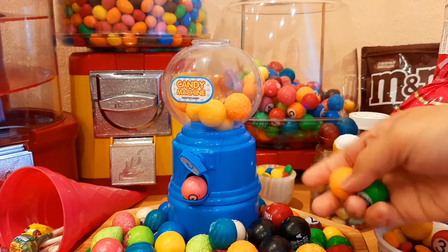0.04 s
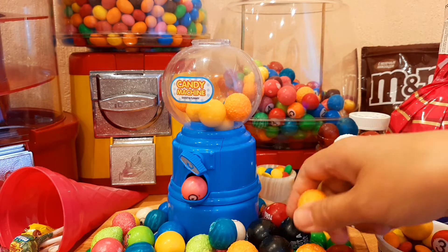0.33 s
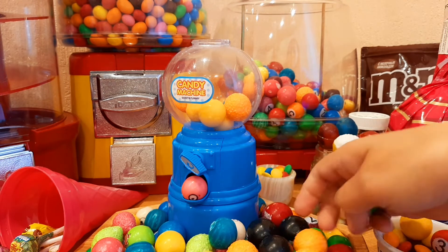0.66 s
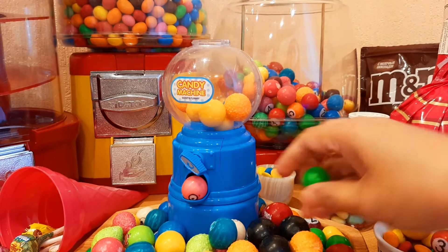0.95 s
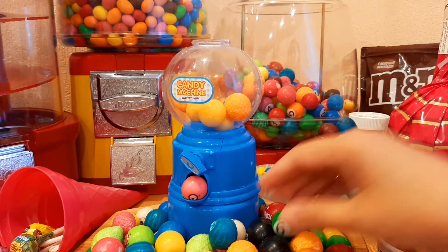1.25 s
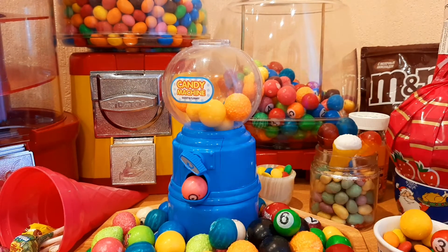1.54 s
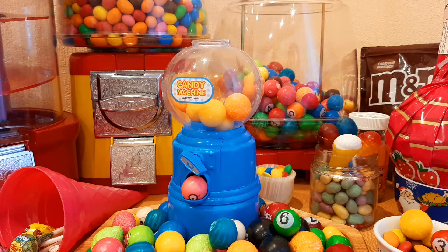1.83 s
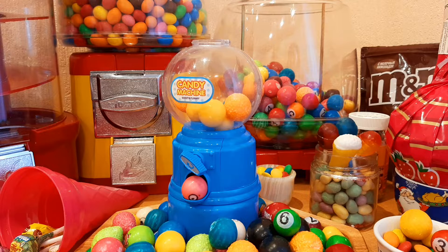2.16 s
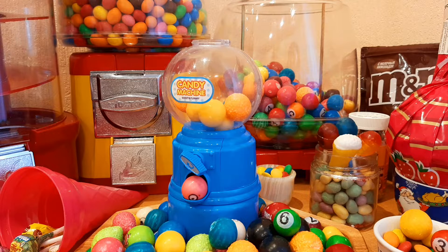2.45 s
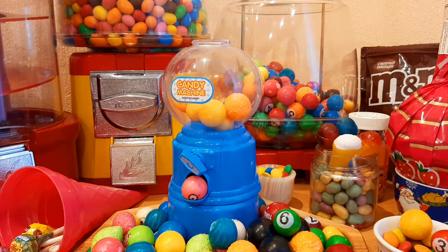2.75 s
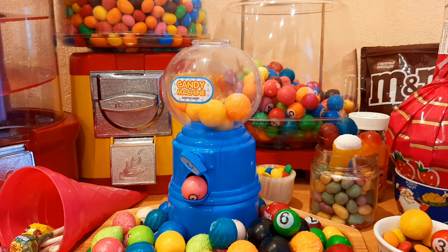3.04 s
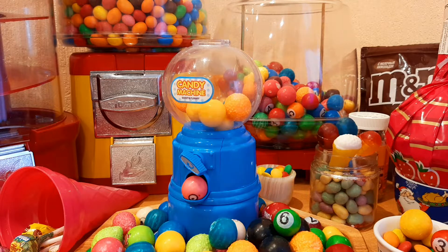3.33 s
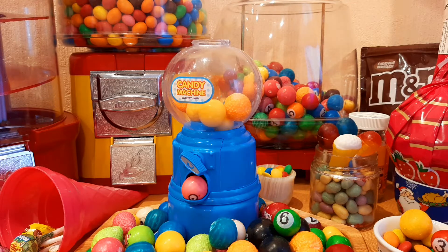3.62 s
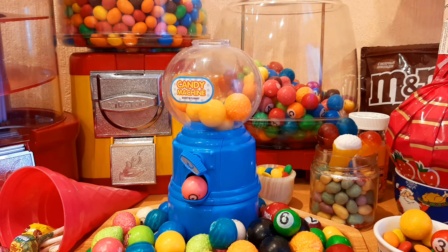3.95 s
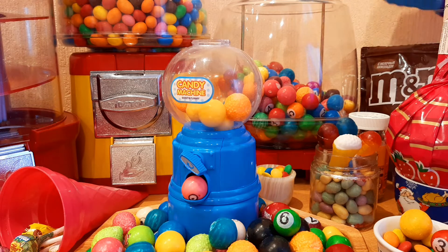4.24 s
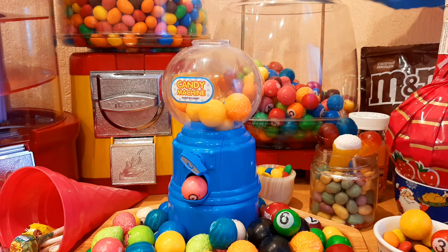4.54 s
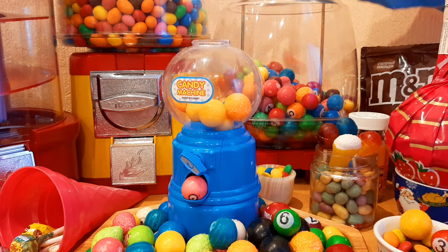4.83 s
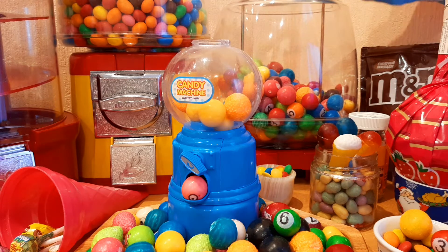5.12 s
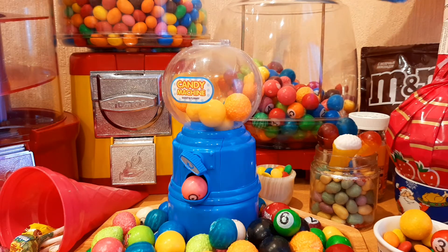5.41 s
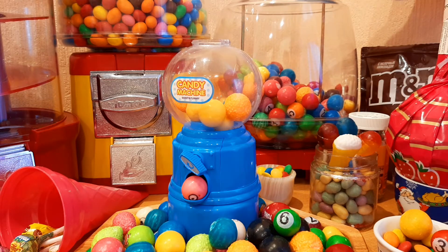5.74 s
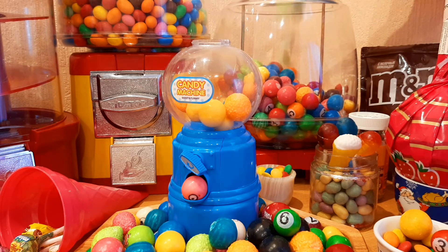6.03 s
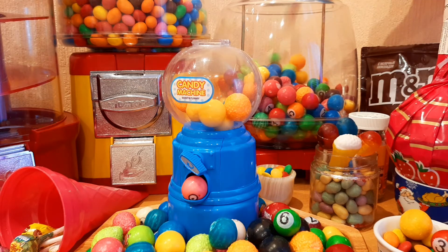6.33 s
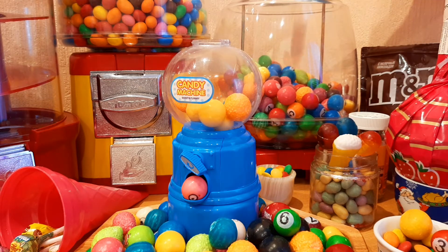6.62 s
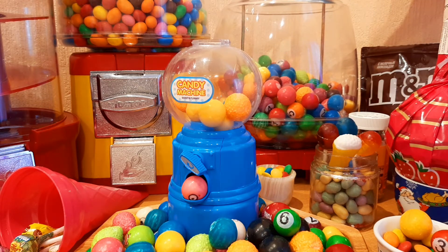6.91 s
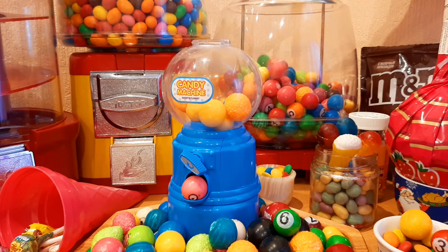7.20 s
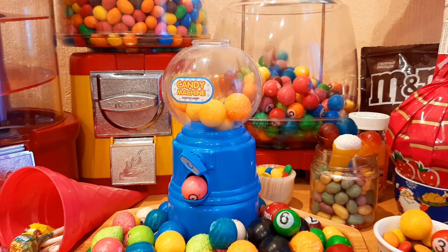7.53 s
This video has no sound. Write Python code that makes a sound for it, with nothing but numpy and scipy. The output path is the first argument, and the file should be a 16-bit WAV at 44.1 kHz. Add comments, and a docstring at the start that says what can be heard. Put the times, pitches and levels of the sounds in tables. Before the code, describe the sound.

Gumballs clack down on a table, a stiff plastic bag crinkles, then gumballs are shaken out and clatter into a plastic bowl.

```python
"""A small live room with a table. A hand sets down a few gumballs, whose hard shells clack together.
A stiff plastic bag is grabbed close by on the right and lifted: creases snap, dimples pop, walls flex.
Gumballs are shaken out of it and clatter onto the heap in the big plastic bowl of a dispenser,
thumping its base and ringing its wall. The room answers every hit."""
import sys
import numpy as np
from scipy import signal
from scipy.fft import rfft, irfft
from scipy.io import wavfile
from scipy.ndimage import uniform_filter1d, minimum_filter1d

SR = 44100
rng = np.random.default_rng(int(sys.argv[2]) if len(sys.argv) > 2 else 0)


def inscribe(sig):
    """Save sig as 16-bit PCM at rate SR to the path in sys.argv[1].

    A 1-D sig is mono; a 2-D sig holds one channel per row.
    Samples are clipped to [-1, 1] before scaling.
    """
    pcm = np.round(np.clip(np.atleast_2d(sig).T, -1, 1) * 32767)
    wavfile.write(sys.argv[1], SR, pcm.astype(np.int16))


N = 333837
TIME = np.arange(N) / SR
HIT_SIZE = 4096  # samples in one hit
AGE = np.arange(HIT_SIZE) / SR  # seconds since the hit
HZ = np.fft.rfftfreq(HIT_SIZE, 1 / SR)

# Gumballs landing in the bowl: start_s, clatter_db, hardness_db, thump_db, wall_db, wall_pitch_hz
LANDINGS = [(4.874, 14, -7.5, 8.5, 2, 1244), (4.9599, 13.5, -6, -13, 14, 869),
            (4.9684, 11, -5, -21, 11.5, 882), (5.0436, 11.5, -5.5, -4, 3.5, 1134),
            (5.0737, 5.5, 4.5, -8, 2, 1920.0), (5.214, 17, -8, -8, 10, 906), (5.3116, 7, -2.5, 3, 3, 920.0),
            (5.3448, 15.5, -7.5, 1.5, 8.5, 906), (5.3729, 10.5, -4, -18.0, 8, 950),
            (5.477, 10, 2, 6, -1, 1130), (5.5683, 0.5, -11, -2, 0.5, 936), (5.7418, -2, -3, -8.0, -2, 908),
            (6.032, 7.5, -2, 0.5, -3.5, 898), (6.098, 8, -4, -19, 2, 944), (6.1435, 9, -4.5, 2.5, 3, 905),
            (6.163, 10, -5, 3, 5, 958), (6.176, 9, -8, 4, 0, 920), (6.2522, 11.5, -10, 3, 6, 560),
            (6.297, -1, 9.5, -31, -3, 1960), (6.3652, 12.5, -1, 1, 3.5, 1980),
            (6.4327, 12, 0.5, 3.5, 6, 959), (6.5466, 10.5, 1.5, -2.5, -2, 2150),
            (6.574, 12, -12, 5.5, 7.5, 539), (6.6969, 7, 1, -6, -2, 874), (6.7552, 12, -3.5, 6.5, -4, 2010),
            (6.8198, 12, -4, -2, -9, 1510), (7.1574, 11, -1.5, 3, 1.5, 943), (7.175, 7, 2.5, -1, -0.5, 985),
            (7.212, 8, 8.5, -27, 3.5, 1990), (7.2934, 15, -6.5, 9, 5.5, 960),
            (7.3287, 7.5, 6, 6.5, -2, 1103), (7.384, 11, -3, 3.5, -4, 2040), (7.462, 14.5, 1, 4, 6, 1130)]
# Tone of the clatter: freq_hz, gain_db
CLATTER_EQ = [(40, -26.5), (100, -11), (200, -23.5), (300, -9.5), (550, -4), (900, -1), (1350, -7),
              (1900, -5), (3200, -9), (5000, -9.5), (7000, -11.5), (9000, -21), (15000, -28)]
# Resonances of the bowl: freq_hz, width_hz, boost_db
BOWL_RESONANCES = [(262, 52, 12.5), (365.5, 13, 7), (1920, 610, 2.5)]
def landings(thump_hz=335, rise_s=0.0008):
    """A gumball lands: the blow rattles its neighbours, thumps the base and rings the wall."""
    out = np.zeros((2, N))
    for start_s, clatter_db, hardness_db, thump_db, wall_db, wall_hz in LANDINGS:
        force = contact(ring_s=0.0053, ring_db=7.5)
        force = chained(force, gain_db=0, spread_s=.015, fade_s=0.014, ring_s=0.0029, count=5)
        # small, later rebounds
        force = chained(force, gain_db=-14.5, spread_s=.055, fade_s=0.049, ring_s=0.0059, count=3)
        force = force * (1 - np.exp(-AGE / rise_s))
        bowl_db = peaks(BOWL_RESONANCES, shift=rng.uniform(0.96, 1.04))
        eq = curve(CLATTER_EQ, HZ) + bowl_db + ripple(depth_db=2.2)
        clatter = amp(clatter_db) * struck(force, eq, shelves(0, hardness_db, 490, 4660))
        thump = amp(thump_db) * note(thump_hz * rng.uniform(0.928, 1.109), ring_s=0.0049)
        wall = amp(wall_db) * wall_chatter(wall_hz, ring_s=0.0056)
        add(out, start_s, panned(clatter + thump + wall, rng.normal(1.0, 0.86), samples_per_db=1))
    return out


def wall_chatter(hz, ring_s, spread_s=.011, detune=0.19, skip_db=-6, skips=2):
    """A ball strikes the wall, then skips onto nearby spots that ring a little higher or lower."""
    out = note(hz, ring_s)
    for when, spot in rng.random((skips, 2)):
        skip = note(hz * (1 + detune * (2 * spot - 1)), ring_s)
        add(out, when * spread_s, amp(skip_db) * skip)
    return out / np.linalg.norm(out[0])


# Light knocks on plastic: start_s, level_db, pitch_hz
KNOCKS = [(1.7644, -19, 1060), (3.112, -20, 890), (3.138, -18, 820), (3.217, -22, 950), (3.303, -13, 1184),
          (3.313, -17, 1350), (3.426, -22, 1100), (3.929, -30.5, 1785), (4.886, 8, 1070), (4.935, 1, 890),
          (5.093, -5, 1720), (5.107, 4.5, 933), (5.143, 3.5, 880), (5.1792, 8.5, 897), (5.249, 1, 950),
          (5.526, -1, 804), (6.119, 4, 1700), (6.492, 2, 1000), (6.5212, 10, 870), (6.6075, 5, 800),
          (6.635, -0.5, 800), (6.917, -3, 893), (7.2547, 3, 1520), (7.5517, 9, 895)]
def knocks(gain_db=-5, tap_db=4.5, above_db_per_octave=3.5, below_db_per_octave=6):
    """Gumballs shift and rebound against plastic: one short hollow note inside a dull tap."""
    out = np.zeros((2, N))
    for start_s, level_db, pitch_hz in KNOCKS:
        octaves = np.log2((HZ + 1) / pitch_hz)
        skirt_db = np.maximum(above_db_per_octave * octaves, -below_db_per_octave * octaves)
        tap = struck(contact(ring_s=0.011, ring_db=20), curve(CLATTER_EQ, HZ) - skirt_db)
        tone = note(pitch_hz, ring_s=0.004, rise_s=0.00063)
        add(out, start_s, amp(level_db + gain_db) * (tone + amp(tap_db) * tap))
    return out


# Tone of shells shifting in the heap: freq_hz, gain_db
HEAP_EQ = [(50, -15), (150, -6.5), (950, 0), (2000, 2), (5000, -5.5), (9000, -18), (15000, -30)]
def heap(ticks_db=-4.5, wash_db=-11, ticks_per_s=110, spread_db=3, variants=32):
    """The heap settles in separate light touches over a faint wash of sliding shells."""
    touches = [shell_touch() for _ in range(variants)]
    chance, pick, size = rng.random((3, N))
    ticks = np.zeros((2, N))
    for i in np.flatnonzero(chance < ticks_per_s / SR):
        strength = amp(-spread_db * np.log(size[i] + 0.024))
        add(ticks, i / SR, strength * touches[int(pick[i] * variants)])
    wash = filtered(grains(per_s=460, spread_db=4.0), curve(HEAP_EQ, HZ) + peaks(BOWL_RESONANCES))
    return (amp(ticks_db) * unit_rms(ticks) + amp(wash_db) * unit_rms(wash)) * heap_motion()


def shell_touch():
    """Two gumballs in the heap meet lightly, with a pitch of their own."""
    pitch_hz = 800 * 2 ** (2.94 * rng.random() ** 2)
    pitch_boost = peaks([(pitch_hz, .2 * pitch_hz, 13)])
    eq = curve(HEAP_EQ, HZ) + peaks(BOWL_RESONANCES) + pitch_boost + ripple(depth_db=3)
    return struck(contact(ring_s=0.0044, ring_db=20.5), eq)


# Shakes that send gumballs streaming over the heap: start_s, length_s, level_db, swell_db
SHAKES = [(4.45, 0.33, -33, -16), (4.88, 0.73, -48, 10), (6.05, 0.17, -24, 3), (6.88, 0.98, -60, -18)]
def heap_motion(stir_db=-44, settle_s=0.15):
    """Envelope of the heap: it streams during a shake, and every landing stirs it briefly."""
    kicks = np.zeros(N)
    for start_s, clatter_db, *_ in LANDINGS:
        kicks[np.searchsorted(TIME, start_s)] = amp(clatter_db + stir_db) ** 2
    stir_power = signal.lfilter([1], [1, -np.exp(-2 / (settle_s * SR))], kicks)
    stream = gestures(SHAKES, attack_s=0.063, release_db_per_s=107)
    return np.sqrt(stir_power + stream ** 2)


# Gumball against gumball on the table: start_s, level_db, brightness_db
CLACKS = [(0.01, -9.5, 7), (0.0161, -4, 10.5), (0.486, 2.5, -10), (0.49, 7.5, 4.5), (0.62, -10.5, -9),
          (0.6505, 4, 0), (0.658, -3, -13), (0.7081, -10, -23), (0.7782, -13, -22), (0.815, -19.5, -39),
          (1.167, -47.5, 27.5), (1.2268, 8.5, 17.5), (1.2589, 1, 8), (1.3159, -4.5, 13), (1.385, -8.5, -11),
          (1.6476, -19.5, 12), (1.6682, -11, -15), (1.741, -18.5, 13), (1.764, -17, -4)]
# Tone of a clack: freq_hz, gain_db
CLACK_EQ = [(40, -32), (120, -21), (300, -9), (900, -7.5), (1600, -2.5), (2300, 3), (3500, 3.5),
            (4400, -0.5), (6000, -12.5), (8000, -27), (10500, -41), (16000, -49.5)]
# Ring of the wood under a clack: pitch_hz, level_db, t60_s
WOOD_MODES = [(125, -9.5, 0.14), (274.8, 0, .12), (351, -1, 0.12)]
def clacks(wood_db=-18):
    """Hard sugar shells meet in a very short click, and the wood rings under it."""
    out = np.zeros((2, N))
    wood = amp(wood_db) * table_boom(WOOD_MODES, rise_s=0.021)
    for start_s, level_db, brightness_db in CLACKS:
        force = contact(ring_s=.0015, ring_db=-1)
        click = struck(force, curve(CLACK_EQ, HZ), shelves(0, brightness_db, 1000, 5100))
        add(out, start_s, amp(level_db) * panned(click + wood, pan_db=6, samples_per_db=1))
    return out


# Loud buckles of the bag: start_s, level_db, brightness_db
CRINKLES = [(1.931, 0.5, -10), (1.9427, 0.5, 3.5), (1.9647, -2.5, -3), (2.0184, 1.5, -5),
            (2.0735, 2.5, 0.5), (2.165, -0.5, -5), (2.196, -8, 12), (2.3068, 3.5, -9), (2.3305, 5.5, -5),
            (2.342, 4, -0.5), (2.479, -2, 8.5), (2.5227, -2, 1), (2.569, -2.5, 2), (2.5892, 7, -9),
            (2.619, 7, -12), (2.634, -4, 11), (2.755, -4, -0.5), (2.825, 8, -7.5), (2.8894, 4.5, -18),
            (2.9289, 0, -11), (3.3429, -19.5, 22), (3.4038, -9, 6.5), (3.4672, -4, 5), (3.5032, -4, -4.5),
            (3.8606, -25, -13), (3.9977, -11.5, -11.5), (4.085, -9, 9), (4.0956, 2.5, 3),
            (4.3906, -13, 6.5), (4.5074, -10.5, 5), (4.517, -5, 7.5), (4.5479, 0.5, 3.5), (4.8593, -3.5, 2),
            (4.932, 3, -9), (5.3202, 1.5, 0), (5.3866, -8.5, 13), (5.789, -4, 2.5), (5.9141, -1, 6),
            (7.015, -4, 4)]
# Tone of snapping plastic: freq_hz, gain_db
CRINKLE_EQ = [(60, -24.5), (200, -1), (450, -1.5), (900, 0), (2000, -1), (3500, -2), (5500, -1.5),
              (8000, -8.5), (12000, -9.5), (16000, -11)]
# The bag's move from the right to near centre: time_s, left_minus_right_db
BAG_PAN = [(2.85, -4.5), (3.1, 1)]
def crinkles(gain_db=1, bass_db=-1, ring_s=0.0022, crispness=.12):
    """Creases of the stiff bag snap through and shake its hollow body; bright snaps are over sooner."""
    out = np.zeros((2, N))
    for start_s, level_db, brightness_db in CRINKLES:
        force = contact(ring_s=ring_s * amp(-crispness * brightness_db), ring_db=7.0)
        force = chained(force, gain_db=-9.5, spread_s=0.0094, fade_s=0.011, ring_s=0.0033, count=3)
        eq = curve(CRINKLE_EQ, HZ) + ripple(depth_db=2.5)
        snap = struck(force, eq, shelves(bass_db, brightness_db, 950, 5600))
        add(out, start_s, amp(level_db + gain_db) * panned(snap, automation(BAG_PAN, start_s)))
    return out


# Dimples in the bag, small ones high, wide ones low: start_s, level_db, pitch_hz
DIMPLE_POPS = [(2.012, -6.5, 3200), (2.091, 6.5, 5760), (2.118, 3, 10000), (2.232, -5, 2570),
               (2.26, -8, 13000), (2.267, -7, 11000), (2.319, 5.5, 12420), (2.382, -2, 1650),
               (2.4593, 5.5, 5700), (2.544, -0.5, 1700), (2.6487, -3, 9300), (2.725, -10.5, 3500),
               (2.9146, -3.5, 2770), (2.9491, -13, 2280), (4.316, -13.5, 1430), (4.375, -12, 1600),
               (4.47, -1.5, 1700), (4.5801, -1, 1840), (4.6292, -4.5, 1500), (4.655, -4.5, 1840),
               (4.6797, 1, 1660), (5.801, -6.5, 7000)]
def dimple_pops(relative_width=0.18, boost_db=5, skirt_db_per_octave=4.5):
    """A dimple in thin plastic flips over: a tick gathered around one short note."""
    out = np.zeros((2, N))
    for start_s, level_db, pitch_hz in DIMPLE_POPS:
        skirt_db = skirt_db_per_octave * np.abs(np.log2((HZ + 1) / pitch_hz))
        eq = curve(CRINKLE_EQ, HZ) + peaks([(pitch_hz, relative_width * pitch_hz, boost_db)]) - skirt_db
        pop = struck(contact(ring_s=0.0019, ring_db=9.5), eq)
        add(out, start_s, amp(level_db) * panned(pop, automation(BAG_PAN, start_s)))
    return out


# The bag's walls popping in and out: start_s, level_db
BAG_FLEXES = [(1.934, -2), (1.964, -4.5), (2.34, 5.5), (2.423, 1.5), (4.052, -4.5), (4.117, -2),
              (4.518, 5.5), (4.777, -5.5), (5.947, -2)]
# Hollow tone of a bag wall, before the pitch ratio shifts it: freq_hz, gain_db
BAG_WALL_EQ = [(50, -35.5), (170, -16), (270, 0), (340, -10), (480, -22), (1500, -28), (5000, -53)]
# The wall rings higher gripped taut, lower once slack: time_s, pitch_ratio
TAUTNESS = [(2.6, 1.724), (4.0, 1.074)]
def bag_flexes(rise_s=0.0069):
    """A soft push swings a wall of the bag for a few cycles."""
    out = np.zeros((2, N))
    for start_s, level_db in BAG_FLEXES:
        push = contact(ring_s=0.0033, ring_db=6) * (1 - np.exp(-AGE / rise_s))
        wall = struck(push, curve(BAG_WALL_EQ, HZ / automation(TAUTNESS, start_s)))
        add(out, start_s, amp(level_db) * panned(wall, automation(BAG_PAN, start_s)))
    return out


# Grips on the bag, swelling as the fingers tighten: start_s, length_s, level_db, swell_db
GRIPS = [(1.921, 0.73, -40, 6.5), (2.56, 0.05, -32.5, 0.5), (3.3, 0.23, -52.5, 8.5), (3.86, 0.17, -51, -13),
         (4.015, 0.14, -40.5, 1), (4.15, 0.38, -74.5, 37.5), (4.48, 0.35, -55, 17), (5.97, 0.53, -37, 9),
         (6.9, 0.62, -37, -2)]
# Hollow rustle of the sagging walls: time_s, level_db
SAG_FADER = [(4.1, -53), (4.6, -39), (5.8, -44.5), (6.35, -40), (7.57, -39.5)]
def bag_rustle(crackle_db=-2, sag_db=-1, fizz_db=-11, drum_db=-7):
    """Small creases crackle under the fingers; close by, the bag fizzes and drums; slack, it rustles."""
    eq = curve(CRINKLE_EQ, HZ) + shelves(bass_db=1.5, treble_db=-10.5, low_hz=685, high_hz=7000)
    crackle = unit_rms(filtered(grains(per_s=1700, spread_db=2.5), eq))
    fizz = unit_rms(np.diff(grains(per_s=680, spread_db=7.0), prepend=0))
    flexing = grains(per_s=600, spread_db=3.5)
    taut, slack = (unit_rms(filtered(flexing, curve(BAG_WALL_EQ, HZ / ratio))) for _, ratio in TAUTNESS)
    pan_db = automation(BAG_PAN, TIME)
    closeness = np.interp(TIME, [time_s for time_s, _ in BAG_PAN], [1, 0])
    creases = amp(crackle_db) * crackle + closeness * (amp(fizz_db) * fizz + amp(drum_db) * taut)
    grip = gestures(GRIPS, attack_s=0.00053, release_db_per_s=331)
    return creases * grip * amp([pan_db / 2, -pan_db / 2]) + amp(sag_db) * slack * fader(SAG_FADER)


# Soft bumps against the table: start_s, level_db
BUMPS = [(1.578, -27), (2.599, -19), (2.812, -2), (2.884, -11)]
# Low ring of the table top: pitch_hz, level_db, t60_s
TABLE_MODES = [(62, -6.5, 0.13), (107, 8.5, 0.054), (259, -2, 0.11)]
def table_bumps():
    """The table top booms softly when it is bumped."""
    out = np.zeros((2, N))
    boom = table_boom(TABLE_MODES, rise_s=0.017)
    for start_s, level_db in BUMPS:
        add(out, start_s, amp(level_db) * panned([boom, boom], pan_db=5.0))
    return out


def table_boom(modes, rise_s):
    """The modes of the table top swell and die away after a blow, energy 1."""
    boom = sum(amp(db - 60 * AGE / t60) * np.sin(2 * np.pi * hz * AGE) for hz, db, t60 in modes)
    fade_out = np.cos(np.pi / 2 * AGE / AGE[-1])
    boom = boom * (1 - np.exp(-AGE / rise_s)) * fade_out
    return boom / np.linalg.norm(boom)


def room(dry, wet_db, treble_db, spots):
    """Hits come from ever different spots, so their patterns of echoes take turns."""
    spot = np.arange(N) // 2048 % spots
    wet = 0
    for k in range(spots):
        send = np.sqrt(np.abs(uniform_filter1d(1. * (spot == k), size=400)))
        wet = wet + signal.oaconvolve(dry * send, reflections(), axes=1)[:, :N]
    return dry + amp(wet_db) * filtered(wet, shelves(0, treble_db, 500, 4200))


# Reverb decay: freq_hz, t60_s
ROOM_DECAY = [(150, 0.5), (400, 0.3343), (1040, 0.2666), (2760, 0.1951), (7280, 0.31), (15000, 0.31)]
# How alike left and right are in the room: freq_hz, correlation
ROOM_CORRELATION = [(100, 0.76), (450, 1), (1000, 0.4), (2000, 0.074)]
# Reverb tone: freq_hz, gain_db
ROOM_EQ = [(25, -4.5), (90, 7.5), (170, -2), (320, -2.5), (700, 0.5), (2500, 2), (7000, -3), (15000, -8.5)]
def reflections(predelay_s=0.0046, build_s=0.068):
    """Echoes of the room: sparse at first, soon dense, each band dying at its own speed."""
    t = np.arange(SR // 2) / SR
    density = np.minimum(t / build_s, 1) ** 2 + .06
    taps = rng.standard_normal((2, len(t))) * (rng.random((2, len(t))) < density) / np.sqrt(density)
    hz, age, bands = signal.stft(correlated(taps * (t > predelay_s), ROOM_CORRELATION), SR, nperseg=256)
    decay = amp(-60 * age / curve(ROOM_DECAY, hz)[:, None])
    _, tail = signal.istft(bands * decay, SR, nperseg=256)
    return filtered(tail / np.sqrt(np.sum(tail ** 2) / 2), curve(ROOM_EQ, HZ))


# Tone of the room's air: freq_hz, gain_db
AIR_EQ = [(35, -27.5), (65, -5), (120, 0), (280, -7.5), (600, -18), (2000, -15), (8000, -25)]
def room_tone(level_db=-77):
    """The faint steady air of the room."""
    noise = correlated(rng.standard_normal((2, N)), ROOM_CORRELATION)
    return amp(level_db) * unit_rms(filtered(noise, curve(AIR_EQ, HZ)))


# How alike left and right are for a close hit: freq_hz, correlation
CLOSE_CORRELATION = [(100, 1), (500, 0.7), (1200, 0.5), (3000, 0.05), (12000, 0)]
def contact(ring_s, ring_db):
    """One hard contact: a spike, then a short dense ring, a little different on each side."""
    ring = correlated(rng.standard_normal((2, HIT_SIZE)), CLOSE_CORRELATION) * np.exp(-AGE / ring_s)
    return (AGE == 0) + amp(ring_db) * unit_rms(ring) / np.sqrt(HIT_SIZE)


def chained(force, gain_db, spread_s, fade_s, ring_s, count):
    """One contact sets off a few more, the later the weaker."""
    for delay_s in spread_s * rng.random(count):
        knock = np.pad(contact(ring_s, ring_db=5.0), ((0, 0), (int(delay_s * SR), 0)))[:, :HIT_SIZE]
        force = force + rng.choice([-1, 1]) * amp(gain_db) * np.exp(-delay_s / fade_s) * knock
    return force


def grains(per_s, spread_db, clump_db=4):
    """A random train of tiny contacts of very unequal size, bunched into little slides."""
    size = amp(spread_db * np.minimum(rng.exponential(1, (2, N)), 4)) * rng.choice([-1, 1], (2, N))
    slides = unit_rms(uniform_filter1d(uniform_filter1d(rng.standard_normal(N), size=700), size=400))
    triggers = rng.random((2, N)) < per_s / SR
    return correlated(size * amp(clump_db * np.clip(slides, -2, 2)) * triggers, CLOSE_CORRELATION)


def note(hz, ring_s, rise_s=0.002):
    """One quickly damped mode after a blow, energy 1."""
    swing = np.sin(2 * np.pi * hz * AGE) * (1 - np.exp(-AGE / rise_s)) ** 2 * np.exp(-AGE / ring_s)
    return np.array([swing, swing]) / np.linalg.norm(swing)


def struck(force, eq_db, shelf_db=0):
    """Gives a force its tone at energy 1, then shelves its bass and treble."""
    return filtered(force, eq_db + shelf_db) / np.sqrt(np.sum(filtered(force, eq_db) ** 2) / 2)


def filtered(x, eq_db):
    """Minimum-phase EQ, given over HZ: it rings only after a hit."""
    log_gain = np.log(amp(np.r_[eq_db, eq_db[-2:0:-1]]))
    response = np.fft.ifft(np.exp(np.conj(signal.hilbert(log_gain)))).real
    return signal.oaconvolve(x, response[None, :HIT_SIZE // 2], axes=1)[:, :x.shape[1]]


def peaks(resonances, shift=1):
    """Bell boosts in dB over HZ."""
    return sum(db / (1 + (2 * (HZ - hz * shift) / width) ** 2) for hz, width, db in resonances)


def shelves(bass_db, treble_db, low_hz, high_hz):
    """Low and high shelf in dB over HZ: a heavy blow has more bass, a hard one more treble."""
    return bass_db / (1 + (HZ / low_hz) ** 4) + treble_db / (1 + (high_hz / (HZ + 1)) ** 4)


def ripple(depth_db, count=28):
    """A random EQ: every spot that is struck favours other frequencies."""
    knots_hz = np.geomspace(150, SR / 2, count)
    return depth_db * curve(np.c_[knots_hz, rng.standard_normal(count)], HZ)


def curve(points, hz):
    """Reads (freq_hz, value) points on a log-frequency axis."""
    freq_hz, value = np.transpose(points)
    return np.interp(np.log(hz + 1), np.log(freq_hz + 1), value)


def automation(points, time_s):
    """Reads (time_s, value) points, holding the end values."""
    return np.interp(time_s, *np.transpose(points))


def fader(points):
    """Smoothed gain from (time_s, level_db) points, silent outside them."""
    active = (TIME > points[0][0]) & (TIME < points[-1][0])
    return uniform_filter1d(amp(automation(points, TIME)) * active, size=200)


def gestures(rows, attack_s, release_db_per_s):
    """Envelope of hand movements: each starts quickly, swells or fades while it lasts, then dies away."""
    out = np.zeros(N)
    for start_s, length_s, level_db, swell_db in rows:
        t = np.maximum(TIME - start_s, 0)
        shape_db = swell_db * np.minimum(t / length_s, 1) - release_db_per_s * np.maximum(t - length_s, 0)
        out += np.minimum(t / attack_s, 1) * amp(level_db + shape_db)
    return out


def correlated(x, correlation):
    """Blends two unrelated channels until they are as alike as asked at each frequency."""
    size = x.shape[1]
    angle = np.arccos(np.clip(curve(correlation, np.fft.rfftfreq(size, 1 / SR)), -1, 1)) / 2
    mid, side = rfft(x) * [np.cos(angle), np.sin(angle)]
    return irfft(np.array([mid + side, mid - side]), size)


def panned(x, pan_db, samples_per_db=4.0):
    """The nearer side is louder and hears the sound a few samples sooner; positive is left."""
    lag = int(round(abs(pan_db) * samples_per_db))
    delays = (0, lag) if pan_db > 0 else (lag, 0)
    gains = unit_rms(amp([pan_db / 2, -pan_db / 2]))
    return np.array([g * np.pad(c, (d, 0))[:len(c)] for c, g, d in zip(x, gains, delays)])


def add(mix, start_s, sound):
    """Mixes a stereo sound in at start_s."""
    part = mix[:, max(round(start_s * SR), 0):][:, :sound.shape[1]]
    part += sound[:, :part.shape[1]]


def amp(db):
    """Decibels to gain."""
    return 10 ** (np.asarray(db) / 20)


def unit_rms(x):
    """Scales to rms 1."""
    return x / np.sqrt(np.mean(x ** 2) + 1e-20)


def scene():
    """Table, bag and bowl, each at its own distance in the room."""
    table = room(clacks() + table_bumps(), wet_db=-4.0, treble_db=-5.5, spots=3)
    plastic = crinkles() + dimple_pops() + bag_flexes() + bag_rustle()
    bag = room(plastic, wet_db=-6.5, treble_db=1.5, spots=4)
    bowl = room(landings() + knocks() + heap(), wet_db=-6, treble_db=3.0, spots=6)
    return table + bag + bowl + room_tone()


def record(dry):
    """The microphone sheds the deepest bass, a fast limiter holds the peaks, a low-pass trims the top."""
    heard = signal.sosfilt(signal.butter(3, 45, "highpass", fs=SR, output="sos"), dry)
    needed_gain = 1 / np.maximum(np.abs(heard), 1)
    limiter_gain = uniform_filter1d(minimum_filter1d(needed_gain, size=41), size=41)
    low_pass = signal.firwin(255, cutoff=16100, window=("kaiser", 8), fs=SR)
    return signal.oaconvolve(heard * limiter_gain, low_pass[None], "same", axes=1)


dry = scene()
out = record(dry)
inscribe(out)
```